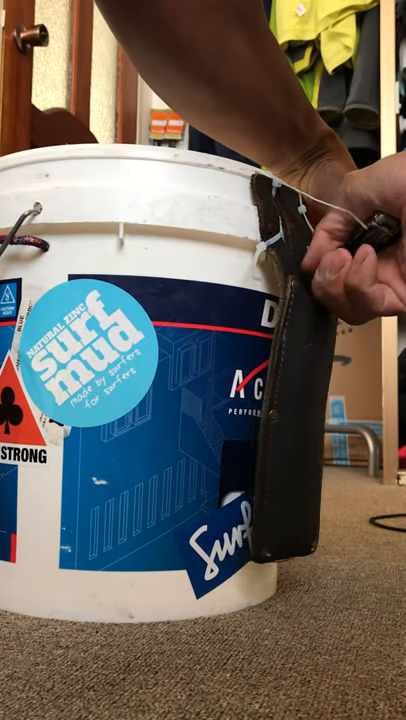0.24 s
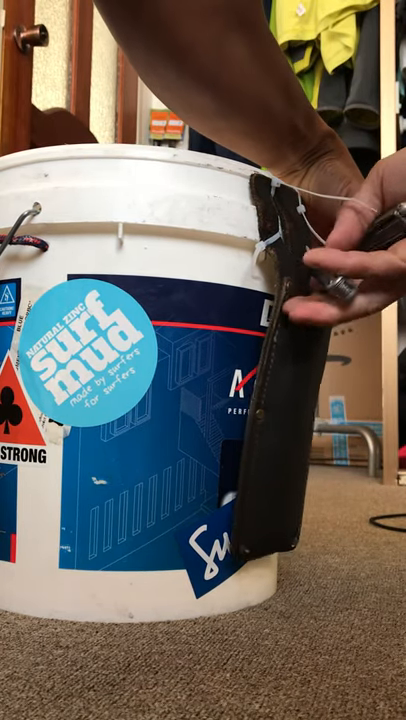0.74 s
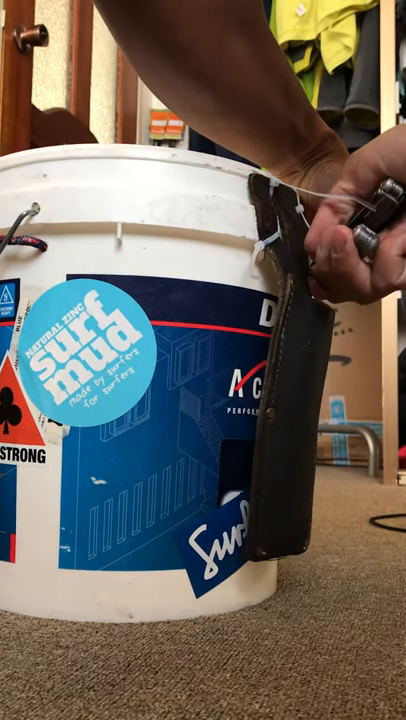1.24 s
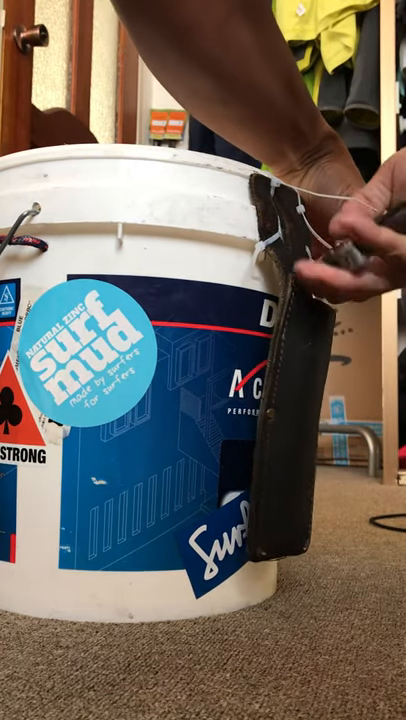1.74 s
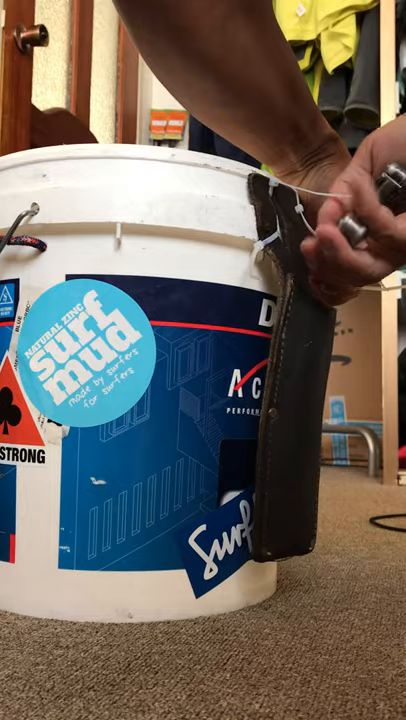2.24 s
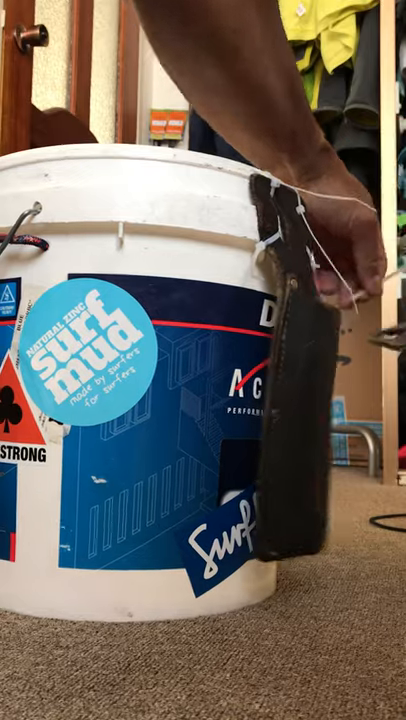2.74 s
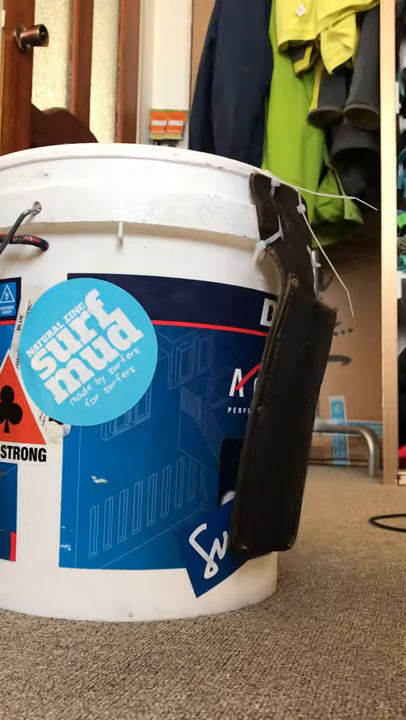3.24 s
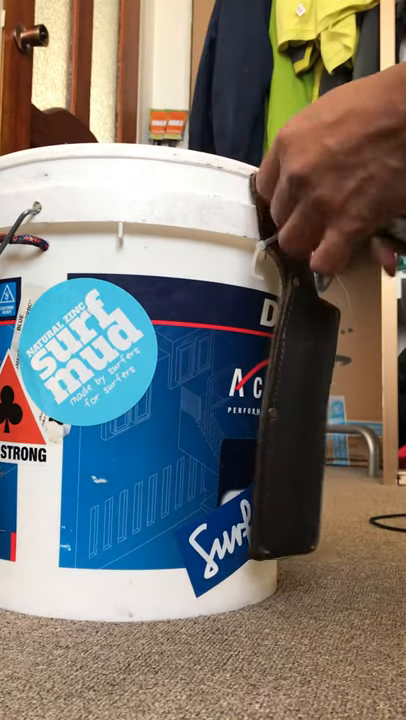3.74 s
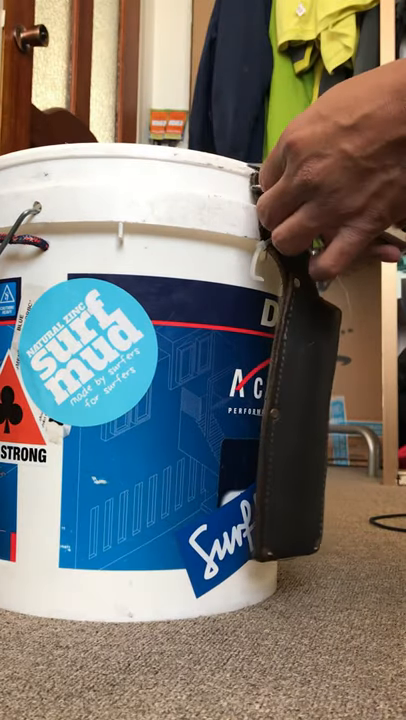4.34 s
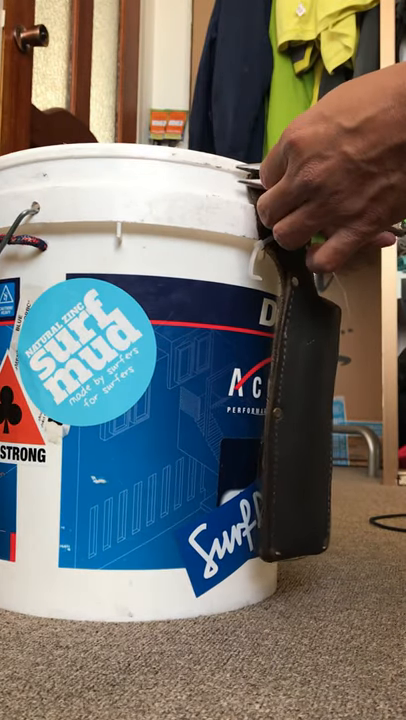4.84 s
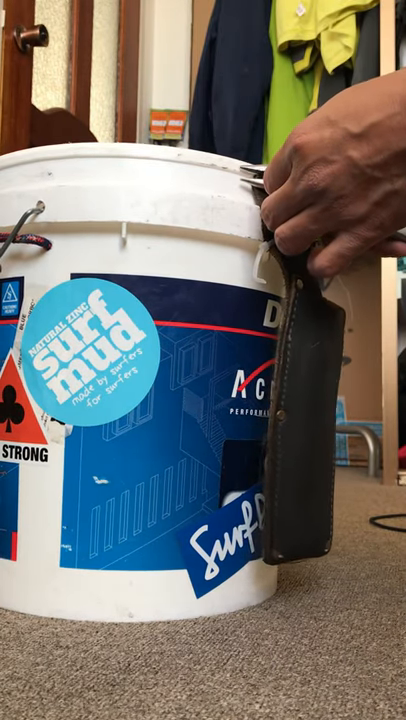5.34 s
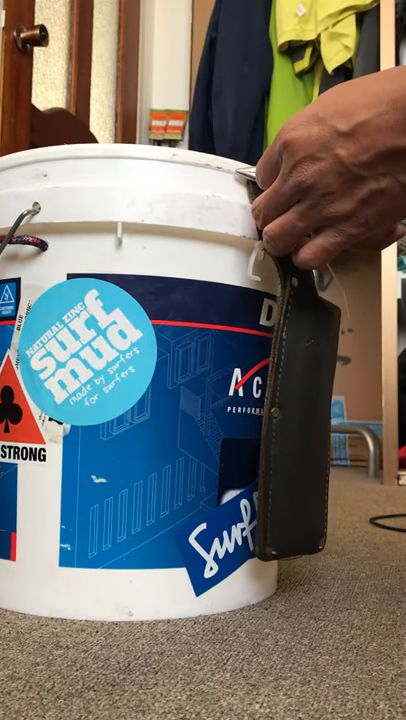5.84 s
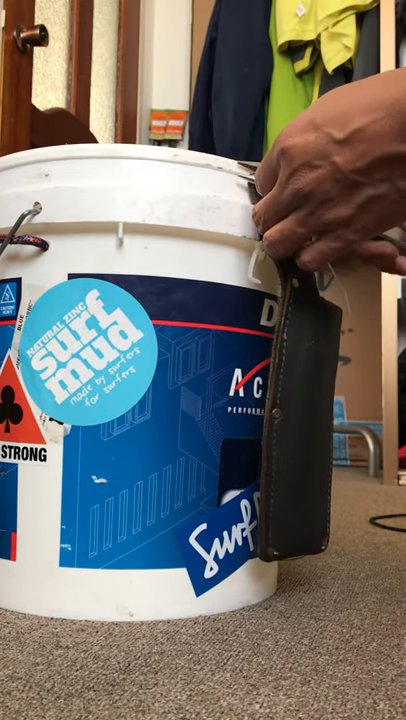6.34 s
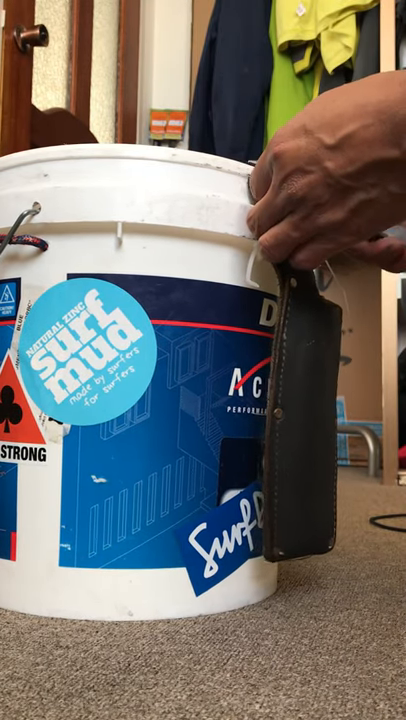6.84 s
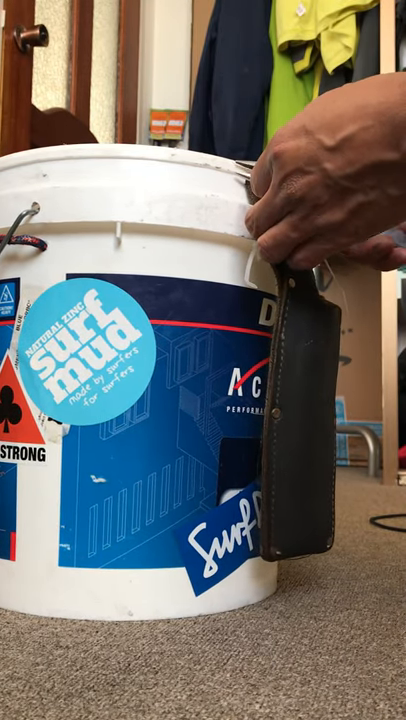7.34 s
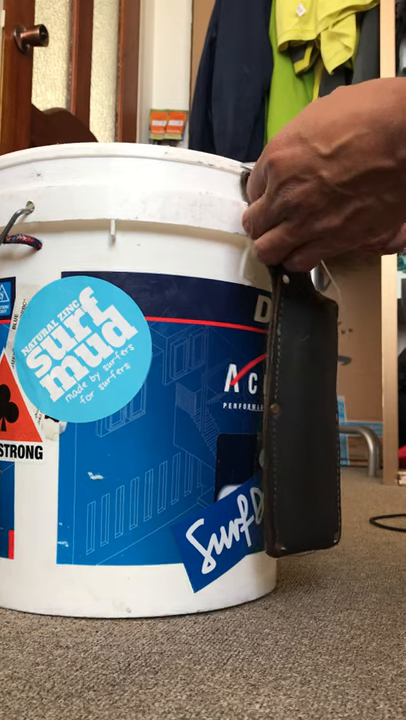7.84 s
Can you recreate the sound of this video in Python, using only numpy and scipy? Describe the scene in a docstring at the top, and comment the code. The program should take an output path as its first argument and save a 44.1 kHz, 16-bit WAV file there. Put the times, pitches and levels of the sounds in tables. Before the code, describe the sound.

A close, dry sound in a small carpeted room, with faint low rumble and soft hiss throughout. A sharp plastic snap opens at 0.0 s, followed by leather shuffling, jaw clicks, pliers clacking and a sheath slap from 0.3 to 0.6 s. A lighter snip with a low thud comes at 1.25 s. At 2.3 s another tie cracks, then a much harder snap at 2.5 s, with a bright zip, hollow clack, scrape and slaps up to 2.9 s. Soft swishes and thin, very high fluttering squeaks follow at 3.3-3.8 s with leather taps. Around 4-4.4 s come a steel click, small bumps and scrapes. A firm hollow bump lands at 5.3 s, a faint tick-like snip at 5.86 s, light bumps at 6.2-6.9 s, then near quiet until a loud, knocking final snap at 7.83 s, with a short room tail.

```python
"""A small carpeted room, microphone close by: pliers snip plastic zip ties off a leather sheath on a plastic bucket.
Each snip is a torn, filtered noise crack with ringing steel, a knock that rings wall modes, and a low thud of sway modes.
Between cuts come bumps, clicks, clacks and slaps, struck the same way, and scrapes, rubs and rustles of many small slips.
A thin squeak of wavering tones chirps a few times; rumble and hiss lie under everything."""
import sys
import numpy as np
from scipy import signal
from scipy.fft import rfft, irfft
from scipy.io import wavfile
from scipy.ndimage import uniform_filter1d

SR = 44100
rng = np.random.default_rng(int(sys.argv[2]) if len(sys.argv) > 2 else 0)


def to_wav(sig):
    """Store sig (one row per channel, or 1-D mono) as 16-bit WAV at the path in sys.argv[1].

    Samples outside -1..1 are clipped; the rate is SR.
    """
    pcm = np.clip(np.atleast_2d(sig), -1, 1) * 32767
    pcm = np.round(pcm).astype(np.int16)
    wavfile.write(sys.argv[1], SR, pcm.T)  # frames by channels


N = 357210  # samples

BINS = np.fft.rfftfreq(4096, 1 / SR)  # filter grid in Hz


def gain_of(db):
    """Decibels to amplitude."""
    return 10 ** (np.asarray(db) / 20)


def evened(x):
    """Scales to rms 1."""
    return x / np.sqrt(np.mean(x ** 2) + 1e-20)


def crested(x):
    """Scales so that the loudest 3 ms have rms 1."""
    power = uniform_filter1d(x ** 2, size=132, mode="constant")
    return x / np.sqrt(power.max() + 1e-20)


def read(points, hz):
    """Reads a table along log frequency."""
    f, value = np.transpose(points)
    return np.interp(np.log(hz + 1), np.log(f + 1), value)


def add(mix, s, sound):
    """Mixes a sound in at time s."""
    part = mix[max(round(s * SR), 0):][:len(sound)]
    part += sound[:len(part)]


def coloured(x, db):
    """Causal, minimum-phase filter with the given gain on BINS, floored 70 dB under its peak."""
    log_gain = np.log(gain_of(np.maximum(db, db.max() - 70)))
    circle = np.concatenate([log_gain, log_gain[-2:0:-1]])
    taps = np.fft.ifft(np.exp(np.conj(signal.hilbert(circle)))).real
    return signal.fftconvolve(x, taps)


def hump(centre_hz, octaves):
    """A broad resonance in dB on BINS, with straight skirts, about 5 dB down the given octaves away."""
    distance = np.log2((BINS + 1) / centre_hz) / octaves
    return -12 * (np.hypot(1, distance) - 1)


def ring(modes, t):
    """Sums decaying sines, one for each (pitch_hz, level_db, t60_s) mode."""
    return sum(gain_of(db - 60 * t / t60) * np.sin(2 * np.pi * hz * t) for hz, db, t60 in modes)


# room rumble and hiss, shape only: pitch_hz [Hz], level_db [dB per Hz, relative]
AIR_SPECTRUM = [(25, -25.5), (52, -3), (102, -2.5), (149, -10), (240, -18), (400, -26.5), (800, -32.5),
                (1400, -34), (2200, -39.5), (5500, -43.5), (7600, -46), (10700, -48), (13800, -40),
                (16000, -49)]
AIR_DB = -55.5  # rms level


def air(low_cut_hz=40):
    """Low room rumble under a smooth hiss: noise shaped in frequency."""
    hz = np.fft.rfftfreq(N, 1 / SR)
    low_cut = 1 / np.sqrt(1 + (low_cut_hz / (hz + 1)) ** 8)
    spectrum = rfft(rng.standard_normal(N)) * gain_of(read(AIR_SPECTRUM, hz)) * low_cut
    return gain_of(AIR_DB) * evened(irfft(spectrum, N))


# the room's tail by band: pitch_hz [Hz], t60_s [s], level_db [dB, before the t60 weighting]
ROOM_TAIL = [(110, 0.54, -8.5), (230, .24, -10), (418.6, 0.15, -14.5), (683, 0.26, -16.5),
             (1200, 0.29, -10.5), (3500, 0.26, -14.5), (8150, 0.23, -13.5), (15000, 0.18, -16.5)]


def room(x, echo_s=0.013, echo_db=-22):
    """One near reflection and a short tail of scattered noise, each band dying at its own speed."""
    t = np.arange(SR // 2) / SR
    scatter = rng.standard_normal(len(t)) * np.clip((t - .003) / 0.019, 0, 1)
    hz, when, bands = signal.stft(scatter, SR, nperseg=256)
    columns = np.array(ROOM_TAIL)
    t60 = read(columns[:, [0, 1]], hz)[:, None]
    db = read(columns[:, [0, 2]], hz)[:, None]
    dying = gain_of(db - 60 * when / t60) * np.sqrt(28 / (t60 * SR))
    tail = signal.istft(bands * dying, SR, nperseg=256)[1]
    add(tail, echo_s, gain_of([echo_db]))
    return signal.fftconvolve(x, tail)[:N]


def rub(s, length, db, centre_hz, octaves, spread_db, taper=.1):
    """A stroke of many small slips of uneven size, bunched into catches a few milliseconds long."""
    count = max(int(length * SR), 16)
    slips = rng.random(count) < 5000 / SR  # about 5000 slips per second
    # averaging 144 draws shrinks their spread 12 times; the 12 restores it
    unevenness = uniform_filter1d(rng.standard_normal(count), size=144, mode="wrap") * 12
    grain = (slips + 0.34) * gain_of(spread_db * unevenness) * rng.standard_normal(count)
    stroke = grain * signal.windows.tukey(count, taper) * np.linspace(1, .6, count)
    sound = coloured(stroke, 1.04 * hump(centre_hz, octaves))
    return s, gain_of(db) * sound * np.sqrt(count / np.sum(sound ** 2))


# a hand changing grip, an arm moving off and back: start_s [s], length_s [s], level_db [dB], centre_hz [Hz]
SWISH_STROKES = [(0.268, 0.38, -74, 13000), (2.595, 0.52, -69, 4470), (3.0, 0.52, -71, 4830),
                 (3.42, 0.51, -71.5, 4120), (4.141, 0.19, -74.5, 3500)]


def swishes():
    """Soft broad-band strokes with long fades."""
    return [rub(*row, octaves=2.2, spread_db=2.0, taper=0.44) for row in SWISH_STROKES]


RUSTLES_PER_S, RUSTLE_S = 2, .04
RUSTLE_DB, RUSTLE_SPREAD_DB = -76, 2  # middle level, and the most it strays either way


def rustles():
    """Very faint, soft 40 ms rustles at random moments."""
    draws = rng.random((int(RUSTLES_PER_S * N / SR), 2))
    levels = RUSTLE_DB + RUSTLE_SPREAD_DB * (2 * draws[:, 1] - 1)
    return [rub(when * N / SR, RUSTLE_S, db, centre_hz=3500, octaves=1.8, spread_db=2, taper=.8)
            for when, db in zip(draws[:, 0], levels)]


# leather shifting under the hand: start_s [s], length_s [s], level_db [dB]
SHUFFLE_STROKES = [(0.34, 0.087, -56), (0.767, 0.074, -67), (1.43, 0.063, -69.5), (1.644, .037, -63),
                   (3.805, 0.112, -63.5), (5.263, .1, -56.5)]


def shuffles():
    """Low leather strokes that slip unevenly."""
    return [rub(*row, centre_hz=287, octaves=0.87, spread_db=4) for row in SHUFFLE_STROKES]


# tie tails sliding through fingers and jaws:
# start_s [s], length_s [s], level_db [dB], centre_hz [Hz], width [octaves to the skirt]
SLIDE_STROKES = [(0.319, 0.097, -68.5, 2500, 2.6), (0.951, 0.078, -67, 2610, 1.16),
                 (1.626, .045, -67.5, 5000, 2.6), (2.383, .013, -65, 3970, .75),
                 (2.5548, 0.018, -39, 7850, 0.67), (3.33, .12, -74, 3660, 0.13),
                 (5.215, 0.14, -67, 4430, 0.31), (5.289, 0.024, -51.5, 4300, 1.2),
                 (6.025, .01, -65, 2460, 1.7), (8.012, .085, -72, 3950, 2),
                 (6.085, 0.037, -62.5, 3500, 2.4)]


def slides():
    """Thin plastic strokes, each with its own pitch and width."""
    return [rub(*row, spread_db=1.5) for row in SLIDE_STROKES]


# chirps of the thin squeak: start_s [s], length_s [s], top_pitch_hz [Hz], mid_chirp_level_db [dB]
SQUEAK_CHIRPS = [(3.285, .19, 12500, -61), (3.46, .17, 12000, -66), (3.615, .16, 12050, -62),
                 (3.58, .23, 14900, -66)]
# tones of each chirp: pitch_factor [ratio], level_db [dB, relative]
CHIRP_TONES = [(1, 0), (.975, -6), (.86, -14), (.71, -9)]
SQUEAK_BEND_S, SQUEAK_FADE_DB = .195, -15  # pitch and level fall away on both sides of the middle


def squeak(s, length, top_hz, db, waver=0.0099, flutter_db=4):
    """One chirp of a faint, fluttering whistle: pitch and level arch together."""
    t = np.arange(-length / 2, length / 2, 1 / SR)
    hz = top_hz * np.exp(-(t / SQUEAK_BEND_S) ** 2)
    out = np.zeros(len(t))
    for factor, tone_db in CHIRP_TONES:
        jitter = 1 + waver * evened(uniform_filter1d(rng.standard_normal(len(t)), size=60))
        flutter = flutter_db * evened(uniform_filter1d(rng.standard_normal(len(t)), size=700))
        phase = 2 * np.pi * np.cumsum(hz * factor * jitter) / SR
        out += gain_of(tone_db + flutter) * np.sin(phase)
    arch = gain_of(db + SQUEAK_FADE_DB * (2 * t / length) ** 2)
    return s, arch * evened(out) * signal.windows.tukey(len(t), .1)


# bucket wall modes: pitch_hz [Hz], level_db [dB, relative], t60_s [s, before damping by hand or tool]
WALL_MODES = [(568, 0.5, 0.27), (600, 5, 0.052), (822, -11.5, 0.34), (1100, 0, 0.15), (1180, -3, 0.15),
              (1328, -4.5, .25), (1383, -5, .25), (1524, -2, 0.22), (1810, -11.5, 0.19), (2187, -8.5, 0.18)]
# the tool scraping along the bucket wall: start_s [s], length_s [s], level_db [dB]
SCRAPE_STROKES = [(2.288, 0.011, -53.5), (2.552, 0.055, -49.5), (2.817, 0.069, -48.5),
                  (4.115, 0.049, -56.5), (4.441, 0.043, -65), (4.886, 0.066, -68), (5.215, 0.11, -65),
                  (5.811, 0.14, -61.5), (6.703, 0.059, -67)]


def scrape(s, length, db, ring_db=-4):
    """Slips on the bucket wall, which sings along."""
    s, stroke = rub(s, length, db, centre_hz=1080, octaves=1.0, spread_db=1.0, taper=0.42)
    t = np.arange(SR // 8) / SR
    damped_wall = ring(WALL_MODES, t) * gain_of(-300 * t)  # the pressing tool damps it
    singing = signal.fftconvolve(stroke, damped_wall)
    sound = singing * gain_of(ring_db) * np.linalg.norm(stroke) / np.linalg.norm(singing)
    add(sound, 0, stroke)
    return s, sound * np.linalg.norm(stroke) / np.linalg.norm(sound)


def tearing(t, part_s, t60, lead_db=-18, pop_db=-4, chatter_db=-17, jaws_s=.0007, jaws_db=-6):
    """Plastic tears for a moment, parts with a pop at part_s, the jaws meet, and it chatters out."""
    after = t - part_s
    rise = gain_of(lead_db * -after / part_s)
    fall = gain_of(-60 * after / t60) + gain_of(chatter_db - 60 * after / (4 * t60))
    swell = np.where(after < 0, rise, fall)
    size = np.linalg.norm(swell)
    add(swell, part_s, gain_of([pop_db]) * size)
    add(swell, part_s + jaws_s, gain_of([jaws_db]) * size)
    fibres = swell * rng.choice([-1., 1.], len(t))
    # a break favours no pitch: nudge every frequency to the same share, within the swell
    for _ in range(8):
        white = irfft(np.exp(1j * np.angle(rfft(fibres))), len(t)) * np.linalg.norm(swell)
        fibres = np.clip(white, -2 * swell, 2 * swell)
    return fibres


def burst(t, t60, grit):
    """One sharp release followed by a dying chatter of tiny contacts."""
    return (t == 0) + grit * rng.standard_normal(len(t)) * gain_of(-60 * t / t60)


# crack of a tie in steel jaws: pitch_hz [Hz], level_db [dB, relative]
CRACK_SPECTRUM = [(500, -28), (1500, -13), (2100, -7), (2700, -1.5), (3500, -4.5), (4100, -1.5),
                  (4700, -11.5), (5400, 0), (6700, -7), (8800, -1), (10200, -7), (13000, -4.5),
                  (16000, -11)]
# brief ring of the steel jaws: pitch_hz [Hz], level_db [dB, relative], t60_s [s]
JAW_MODES = [(2600, -3, .05), (3614, 0.5, 0.042), (4243, -2.5, 0.042), (5590, 0, .06), (6000, -5, .05),
             (9030, -1.5, .05)]


def crack_sound(t, part_s, t60, crack_hz, tie_db, steel_db, tilt_db):
    """Torn noise with one resonance, the ringing steel jaws, and a treble tilt over both."""
    # the free length of the tie sets one resonance
    tie = tie_db * np.exp(-(np.log2((BINS + 1) / crack_hz) / .4) ** 2)
    crack = crested(coloured(tearing(t, part_s, t60), read(CRACK_SPECTRUM, BINS) + tie))
    add(crack, part_s, gain_of(steel_db) * crested(ring(JAW_MODES, t)))
    # a cleaner break keeps more treble: tilt per octave above 4200 Hz, for 1.2 octaves
    treble = np.clip(np.log2((BINS + 1) / 4200), 0, 1.2)
    return coloured(crack, tilt_db * treble)[:len(t)]


# first, quickly damped answer of the bucket: pitch_hz [Hz], level_db [dB, relative]
KNOCK_SPECTRUM = [(150, -17), (310, 0.5), (410, -11), (500, -0.5), (590, 6.5), (700, -8), (850, 0.5),
                  (1000, -2), (1200, 1), (1500, -5), (2100, -4), (4000, -10)]


def knock_sound(t, t60, knock_hz, octaves, ring_db):
    """A filtered burst that leaves the bucket wall ringing."""
    landing = hump(knock_hz, octaves)
    knock = coloured(burst(t, t60, grit=0.079), read(KNOCK_SPECTRUM, BINS) + landing)[:len(t)]
    # where the blow lands decides how strongly each wall mode answers
    spot = 2 * rng.standard_normal(len(WALL_MODES))
    spot += .55 * np.interp(np.array(WALL_MODES)[:, 0], BINS, landing)
    modes = [(hz, db + luck, mode_t60) for (hz, db, mode_t60), luck in zip(WALL_MODES, spot)]
    wall = ring(modes, t) * gain_of(-70 * t)  # the hand on the rim damps the wall
    return crested(crested(knock) + gain_of(ring_db) * crested(wall))


# low modes of the bucket with the sheath on it: pitch_hz [Hz], level_db [dB, relative], t60_s [s]
SWAY_MODES = [(58.3, 2.5, 0.2), (84, 0, 0.12), (116, 2, 0.091), (140, -1, 0.07), (178, 1, 0.093),
              (207.8, -0.5, .09), (240, 0, 0.086), (286, 2, 0.04)]


def thud_sound(t, thud_hz, octaves):
    """Slower sway of the bucket; the softness of the push picks which low modes answer."""
    push = hump(thud_hz, octaves)
    modes = [(hz, db + np.interp(hz, BINS, push), t60) for hz, db, t60 in SWAY_MODES]
    sway = ring(modes, t) * (1 - np.exp(-t / 0.0027))
    high_pass = signal.butter(2, 50, "high", fs=SR, output="sos")
    return crested(signal.sosfilt(high_pass, sway))


def blow(s, crack_db, tilt_db, crack_hz, knock_db, knock_hz, thud_db, thud_hz, ring_db,
         part_s=0.0017, crack_t60=0.018, knock_t60=0.047, knock_octaves=0.66, thud_octaves=0.5,
         tie_db=6, steel_db=-15):
    """A crack that rings the steel jaws, then at part_s a knock on the wall and a thud."""
    t = np.arange(SR // 3) / SR
    sound = gain_of(crack_db) * crack_sound(t, part_s, crack_t60, crack_hz, tie_db, steel_db, tilt_db)
    knock = gain_of(knock_db) * knock_sound(t, knock_t60, knock_hz, knock_octaves, ring_db)
    thud = gain_of(thud_db) * thud_sound(t, thud_hz, thud_octaves)
    add(sound, part_s, knock + thud)
    return s, sound


# the leather sheath slapping the bucket: start_s [s], knock_level_db [dB]
SHEATH_SLAPS = [(0.527, -42), (2.835, -42.5), (3.2957, -42), (3.4518, -52)]


def slap(s, db, tick_db=-15, sway_db=0.5):
    """Leather lands flat and deadens the wall it strikes, so the ring is weak."""
    return blow(s, db + tick_db, tilt_db=-2, crack_hz=2190, knock_db=db, knock_hz=510,
                thud_db=db + sway_db, thud_hz=263, ring_db=-16)


# the pliers clacking open: start_s [s], knock_level_db [dB]
PLIER_CLACKS = [(0.415, -43.5), (0.5518, -43.5), (2.6399, -33.5)]


def clack(s, db, tick_db=-21, sway_db=1):
    """The pliers hit their stop with a dry, hollow clack, almost without wall ring."""
    return blow(s, db + tick_db, tilt_db=-18, crack_hz=2000, knock_db=db, knock_hz=1680,
                thud_db=db + sway_db, thud_hz=144, ring_db=-40)


# steel jaws clicking shut on nothing or on the tie's head:
# start_s [s], level_db [dB, before tilt], pitch_hz [Hz], treble_tilt [dB per octave]
JAW_CLICKS = [(0.3677, -54, 2760, -38), (0.5315, -34, 2970, -18.5), (1.1694, -51.5, 5040, -1),
              (2.824, -43, 2100, -8), (3.105, -52, 2110, -21), (3.9734, -43, 5420, -11)]


def click(s, db, hz, tilt_db, wall_db=-10, sway_db=-15):
    """Steel on steel: little of it reaches the bucket."""
    return blow(s, db, tilt_db, hz, db + wall_db, knock_hz=646,
                thud_db=db + sway_db, thud_hz=150, ring_db=7)


# hand, tool and sheath bumping the rim:
# start_s [s], knock_level_db [dB], knock_hz [Hz], thud_level_db [dB], thud_hz [Hz]
RIM_BUMPS = [(1.266, -62, 560, -38.5, 178), (2.57, -46, 1000, -33, 103), (2.8615, -49.5, 1040, -57, 97),
             (3.9747, -50, 584, -34.5, 104.4), (4.115, -55, 1135, -39.5, 187),
             (4.1486, -52, 1180, -47, 134), (4.2054, -50.5, 940, -57, 76), (4.8956, -52, 567, -39, 128),
             (5.3067, -35, 1250, -26, 202), (5.341, -56, 1400, -46, 245), (5.4423, -48, 540, -36, 120),
             (6.1551, -49, 1110, -45.5, 150), (6.7117, -49, 575, -39.5, 106),
             (6.8931, -49.5, 1034, -34, 105)]


def bump(s, knock_db, knock_hz, thud_db, thud_hz, tick_db=-15):
    """A padded bump: the wall rings, with a faint tick that follows the knock's strength."""
    return blow(s, knock_db + tick_db, tilt_db=-5, crack_hz=2200, knock_db=knock_db, knock_hz=knock_hz,
                thud_db=thud_db, thud_hz=thud_hz, ring_db=-8)


# ties parting in the jaws: start_s [s], tear_s [s], crack_level_db [dB, before tilt],
# treble_tilt [dB per octave], crack_hz [Hz], knock_level_db [dB], knock_width [octaves to the skirt],
# thud_level_db [dB], thud_hz [Hz], wall_ring_db [dB relative to the knock]
TIE_SNAPS = [(0.029, .0036, -24, -13, 3100, -31, 1.65, -36.5, 190, -16),
             (1.25, 0.00095, -29, 1, 2280, -48, 1.7, -34.5, 161, -7),
             (2.2984, 0.00094, -27, -2.5, 2530, -41.5, 1.8, -34.5, 196, -7.5),
             (2.4952, 0.00096, -16, -4, 4900, -22.5, 1.7, -21.5, 240, -16),
             (5.861, 0.002, -43.5, 7, 4460, -54, 0.86, -40.5, 222, -6),
             (7.8297, .0033, -22, -4, 5100, -18, 1.17, -24.5, 172, -7.5)]


def snip(s, tear_s, crack_db, tilt_db, crack_hz, knock_db, knock_octaves, thud_db, thud_hz, ring_db):
    """A tie tears and parts; the recoil knocks the rim, always centred on the same pitch."""
    return blow(s, crack_db, tilt_db, crack_hz, knock_db, knock_hz=560,
                thud_db=thud_db, thud_hz=thud_hz, ring_db=ring_db, part_s=tear_s, crack_t60=0.02,
                knock_t60=0.038, knock_octaves=knock_octaves, thud_octaves=0.8, tie_db=6.5)


def scene():
    """All the handling, heard direct and through the room, over the air."""
    sounds = swishes() + rustles() + shuffles() + slides()
    sounds += [squeak(*row) for row in SQUEAK_CHIRPS]
    sounds += [scrape(*row) for row in SCRAPE_STROKES]
    sounds += [slap(*row) for row in SHEATH_SLAPS]
    sounds += [clack(*row) for row in PLIER_CLACKS]
    sounds += [click(*row) for row in JAW_CLICKS]
    sounds += [bump(*row) for row in RIM_BUMPS]
    sounds += [snip(*row) for row in TIE_SNAPS]
    near = np.zeros(N)
    for s, sound in sounds:
        add(near, s, sound)
    return (near + room(near) + air())[None]


def record(dry):
    """The recorder's band limit: a steep low-pass at 16050 Hz."""
    low_pass = signal.firwin(255, 16050, window=("kaiser", 8), fs=SR)
    return signal.oaconvolve(dry, low_pass[None], "same")


dry = scene()
out = record(dry)
to_wav(out)
```